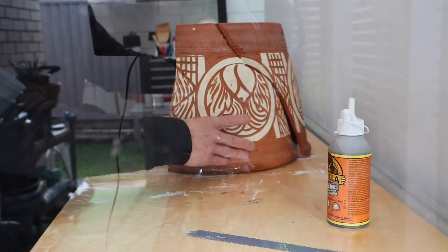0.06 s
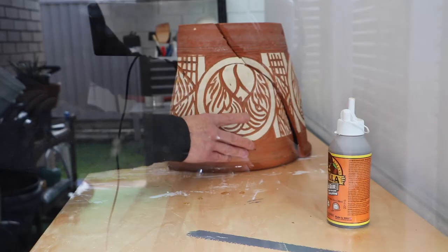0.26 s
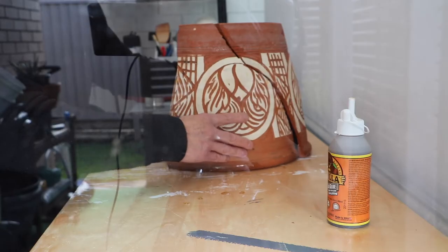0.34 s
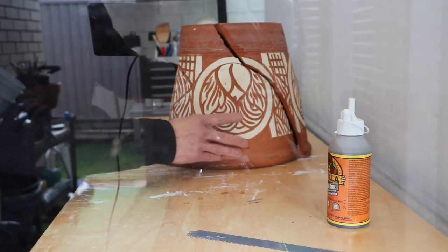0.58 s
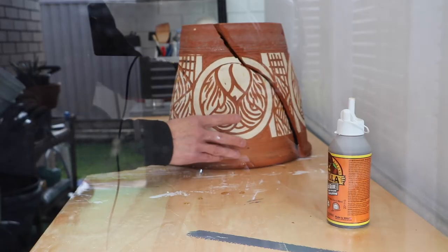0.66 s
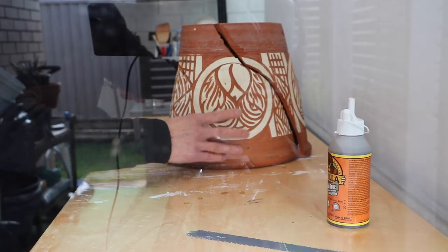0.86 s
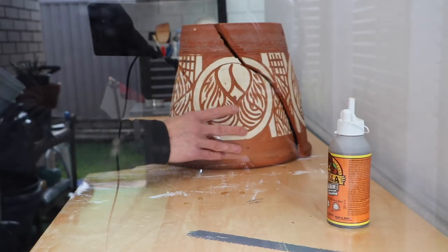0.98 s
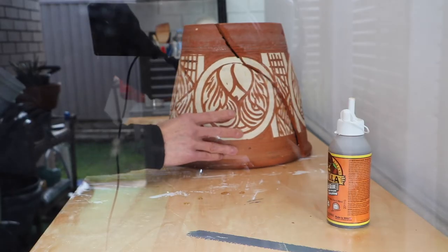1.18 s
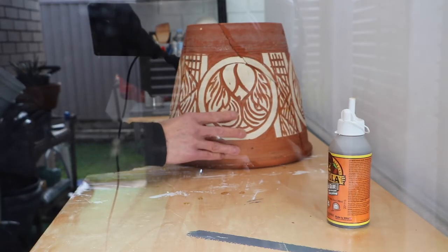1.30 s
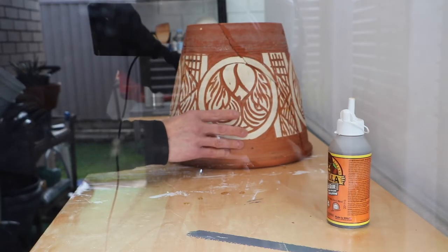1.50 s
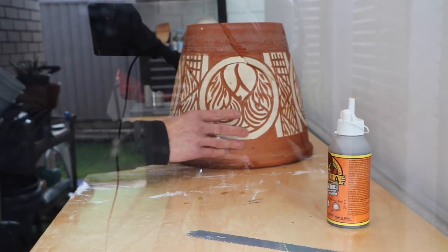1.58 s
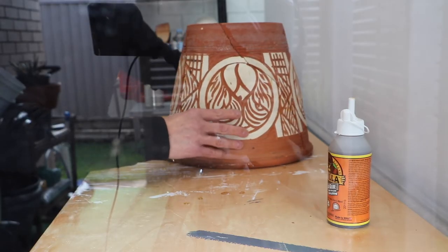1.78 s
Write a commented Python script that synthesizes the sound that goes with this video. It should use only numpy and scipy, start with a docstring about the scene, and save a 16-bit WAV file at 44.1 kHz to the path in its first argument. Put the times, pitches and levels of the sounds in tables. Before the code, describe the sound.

Close up in a small, bare room, a hollow clay pot thumps twice on a booming wooden table with a soft slide between. Two gritty shard scrapes follow, with ticking crumbs, over faint hiss and a low drone.

```python
"""A cracked clay pot, upside down on a wooden table, close to one microphone in a small, bare room.
It is set down with a knock, slid softly and knocked down again: the table top thumps and booms and the
hollow pot rings. Then a loose shard sticks and slips along the crack, in a long scrape and a short one.
Crumbs of clay tick, and a low drone swells under the room's hiss."""
import sys
import numpy as np
from scipy import signal
from scipy.fft import rfft, irfft
from scipy.io import wavfile

SR = 44100
rng = np.random.default_rng(int(sys.argv[2]) if len(sys.argv) > 2 else 0)


def wrap_up_sound(samples):
    """Save the sound to the file named by the first command line argument, as 16-bit audio."""
    columns = np.atleast_2d(samples).T
    # keep every value between -1 and 1, then stretch to whole-number steps
    tamed = np.clip(columns, -1, 1)
    steps = np.round(tamed * 32767).astype(np.int16)
    wavfile.write(sys.argv[1], SR, steps)


N = 81585
T = np.arange(N) / SR
CRACK_SWELL_S = .0002

# the pot bumps the table: start_s, thump_db, thump_hz, thump_t60_s, clack_db
BUMPS = [(0.2186, 0.2, 283, 0.025, -13), (0.6462, -2.5, 276, 0.0016, -16.5),
         (0.6523, -4.5, 203, 0.051, -34), (1.139, -16, 250, 0.058, -30), (1.176, -10.5, 358, 0.016, -29),
         (1.1849, -7, 291, 0.021, -31), (1.598, -16.5, 232, 0.011, -29), (1.6148, -13.5, 199, 0.0049, -25)]
# colour of the shard grinding in the crack: frequency_hz, density_db
GRIND_COLOUR = [(70, -37), (170, 11), (380, 5), (550, -1.5), (900, -2.5), (1400, -5), (2500, -3.5),
                (3200, -8), (4200, -8.5), (6500, -15), (9000, -21.5), (16000, -28)]


def from_db(db):
    """Decibels to gain."""
    return 10 ** (np.asarray(db) / 20)


def rms_one(x):
    """Scale to unit power."""
    return x / np.sqrt(np.mean(x ** 2) + 1e-20)


def level(curve):
    """Gain over time from (time_s, level_db) points, silent outside them."""
    return from_db(np.interp(T, *np.transpose(curve), left=-120, right=-120))


def at_hz(rows, hz, axis=1):
    """Read a column of a table on a log-frequency axis."""
    rows = np.array(rows)
    return np.interp(np.log(hz + 1), np.log(rows[:, 0]), rows[:, axis])


def filtered(x, kind, hz, order=2):
    """Butterworth low, high or band pass."""
    return signal.sosfilt(signal.butter(order, hz, kind, fs=SR, output="sos"), x)


def drift(rate_hz):
    """Slow random wander of unit power."""
    r = np.exp(-2 * np.pi * rate_hz / SR)
    return rms_one(signal.lfilter([1], [1, -2 * r, r * r], rng.standard_normal(2 * N))[N:])


def coloured(x, spectrum, size=8192):
    """Causal filter with the given spectrum that keeps the power of white noise."""
    gains = from_db(at_hz(spectrum, np.fft.rfftfreq(size, 1 / SR)))
    cepstrum = irfft(np.log(gains))
    cepstrum[1:size // 2] *= 2  # fold to minimum phase
    cepstrum[size // 2 + 1:] = 0
    response = irfft(np.exp(rfft(cepstrum)))
    return signal.fftconvolve(x, response / np.linalg.norm(response))[:N]


def dying(start_s, t60_s, swell_s, hold_s=0):
    """Envelope that swells from its start, holds, then dies away."""
    age = np.maximum(T - start_s, 0)
    rise = 1 - np.exp(-(age / swell_s) ** 2)
    return rise * np.exp(-np.log(1000) * np.maximum(age - swell_s - hold_s, 0) / t60_s)


def ringing(contact, modes, ring_db=0):
    """A contact force sets modes ringing, each a damped resonator."""
    out = np.zeros(N)
    for hz, db, t60 in modes:
        r = np.exp(-np.log(1000) / (t60 * SR))
        feed = np.array([1, 0, -1]) * (1 - r * r) / 2
        feedback = [1, -2 * r * np.cos(2 * np.pi * hz / SR), r * r]
        out += from_db(db + ring_db) * signal.lfilter(feed, feedback, contact)
    return out


def background(drone_hz=114.3, waver_hz=1.1, octave_db=-10, hiss_db=-40.5):
    """Room tone: steady hiss, a low rumble and a wavering drone."""
    # swells of the drone and the rumble: time_s, level_db
    drone_levels = [(.6, -55), (.75, -31.5), (.95, -45.5), (1.25, -43), (1.4, -31), (1.62, -28.5),
                    (1.72, -40.5), (1.85, -37.5)]
    rumble_levels = [(0, -46), (.44, -36.5), (1.85, -42)]
    # colours of the rumble and the hiss: frequency_hz, density_db
    rumble_colour = [(40, -15), (80, 13), (110, 16.5), (170, -15.5), (600, -77)]
    hiss_colour = [(25, 6.5), (50, 4.5), (85, 10), (150, -8), (240, 7), (500, -3.5), (1000, -3.5),
                   (2000, -14.5), (4000, -21), (8000, -26), (16000, -28.5)]
    phase = 2 * np.pi * np.cumsum(drone_hz + waver_hz * drift(rate_hz=3.9)) / SR
    drone = level(drone_levels) * rms_one(np.sin(phase) + from_db(octave_db) * np.sin(2 * phase))
    rumble = level(rumble_levels) * coloured(rng.standard_normal(N), rumble_colour)
    hiss = from_db(hiss_db) * coloured(rng.standard_normal(N), hiss_colour)
    return drone + rumble + hiss


def room(direct, delay_s=.012):
    """Diffuse reflections off the bare walls reach the microphone late; the low mids last longest."""
    # reverberation against the direct sound: frequency_hz, level_db, t60_s
    reverb = [(90, -20, 0.3), (268, -17, 0.96), (620, 2, 0.75), (1770, -10, 0.52), (4460, -15.5, 0.15),
              (12000, -10, 0.23)]
    edges = np.geomspace(45, 18000, 10)  # bands about an octave wide
    response = 0
    for low, high in zip(edges, edges[1:]):
        hz = np.sqrt(low * high)
        tail = dying(delay_s, at_hz(reverb, hz, axis=2), swell_s=.0024) * rng.standard_normal(N)
        band = filtered(tail, "band", [low, high])
        gain = from_db(at_hz(reverb, hz)) * np.sqrt(2 * (high - low) / SR)
        response = response + gain * band / np.linalg.norm(band)
    return signal.fftconvolve(direct, response)[:N]


def boom(centre_hz=211.6, width_hz=62):
    """Uneven friction drives the table top's broad low resonance."""
    # the wood booms as the pot drags on it: time_s, level_db
    boom_levels = [(.12, -52), (.19, -25.5), (.28, -32), (.33, -27.5), (.41, -31), (.49, -37.5),
                   (.56, -35.5), (.63, -26.5), (.9, -63), (1.07, -36.5), (1.13, -44)]
    band_hz = [centre_hz - width_hz / 2, centre_hz + width_hz / 2]
    return level(boom_levels) * rms_one(filtered(rng.standard_normal(N), "band", band_hz))


def grit(grains_per_s=8000, spread_db=2.8):
    """Dense clicks of uneven size as grains of clay catch and break."""
    sizes = from_db(spread_db * np.minimum(rng.exponential(1, N), 4))
    signs = rng.choice([-1, 1], N)
    breaks = rng.random(N) < grains_per_s / SR
    return rms_one(sizes * signs * breaks)


def ticks():
    """Crumbs crack under the rim in small bright bursts."""
    # cracking crumbs: start_s, relative_db, t60_s
    cracks = [(0.0333, -27.5, 0.01), (0.456, -30.5, 0.079), (0.9025, -21, .004), (1.308, -18.5, 0.087),
              (1.3369, -18.5, 0.024), (1.473, -20.5, .014), (1.5325, -32, 0.13), (1.5974, -19.5, 0.037),
              (1.673, -19.5, 0.0022), (1.788, -29, 0.069)]
    # their colour: frequency_hz, density_db
    colour = [(120, -1), (400, 11.5), (1500, 8), (4500, 3.5), (8000, -2.5), (12000, -5.5), (16000, -13)]
    force = sum(from_db(db) * dying(s, t60, CRACK_SWELL_S) for s, db, t60 in cracks)
    return coloured(force * grit(), colour)


def slips(slips_per_s=130, t60_s=.024):
    """The rough edges catch at uneven intervals; each release is sudden and dies quickly."""
    gap, size = rng.uniform(.3, 1.7, (2, 900))
    starts = (np.cumsum(gap) - gap[0]) / slips_per_s
    latest = np.searchsorted(starts, T, side="right") - 1
    return size[latest] * np.exp(-np.log(1000) * (T - starts[latest]) / t60_s)


def scrape(friction, colour, slip_db=6):
    """Grit under a stroke that sticks and slips."""
    stick_slip = rms_one(grit() * (1 + from_db(slip_db) * slips()))
    return coloured(level(friction) * stick_slip, colour)


def chip():
    """The short scrape and the crumbs ring a chipped edge, high and briefly."""
    # friction of the short stroke: time_s, relative_db
    friction = [(1.555, -42), (1.561, -24.5), (1.567, -21), (1.58, -29.5), (1.589, -21), (1.601, -25),
                (1.635, -52)]
    # its colour: frequency_hz, density_db
    colour = [(70, -29), (170, 8), (700, 5), (1600, -3), (3000, -5), (5600, -0.5), (8000, -11),
              (12300, -6.5), (16000, -26)]
    # modes of the edge: pitch_hz, relative_db, t60_s
    modes = [(2168, 7, 0.029), (3420, 9, 0.08), (5800, -3, 0.026)]
    grinding, crumbs = scrape(friction, colour), ticks()
    return grinding + crumbs + ringing(grinding, modes, ring_db=6.5) + ringing(crumbs, modes, ring_db=-8)


def jolts(t60_s=.055, low_cut_hz=320):
    """Sudden bursts of grit, with little bass, that fall away as the edges catch again."""
    # the shard jolts free: start_s, relative_db
    releases = [(1.134, -18.5), (1.1424, -19.5), (1.1675, -18.5), (1.1865, -12), (1.2068, -11.5),
                (1.2161, -16.5), (1.224, -19), (1.251, -19), (1.2615, -12)]
    force = sum(from_db(db) * dying(s, t60_s, CRACK_SWELL_S) for s, db in releases)
    return filtered(coloured(force * grit(), GRIND_COLOUR), "high", low_cut_hz)


def shard():
    """The long scrape: the shard rings weakly while wedged and more strongly as it comes loose."""
    # friction of the long stroke: time_s, relative_db
    friction = [(1.04, -47), (1.1, -46), (1.134, -35), (1.148, -17), (1.162, -23.5), (1.178, -15.5),
                (1.225, -22.5), (1.243, -19), (1.272, -24), (1.295, -27.5), (1.375, -32.5), (1.44, -44)]
    # how strongly the grinding drives the shard: time_s, gain_db
    loosening = [(1.17, -4), (1.215, 1.5)]
    # modes of the shard: pitch_hz, relative_db, t60_s
    modes = [(388, 1, .35), (583, 5, .55), (808, 5, .08), (856, 9, .11), (1232, 4, .2), (1551, 7, .1),
             (1710, 9, .25), (2152, 9, .1), (2688, 7, .13), (4040, 9, .07), (4685, 5, .12), (5075, 4, .12),
             (5915, 4, .15)]
    grinding = scrape(friction, GRIND_COLOUR) + jolts()
    freedom = from_db(np.interp(T, *np.transpose(loosening)))
    return grinding + ringing(grinding * freedom, modes)


def slide():
    """The rim rubs smoothly over the wood."""
    # friction of the rim: time_s, level_db
    friction = [(.12, -48.5), (.16, -48), (.172, -34), (.21, -42.5), (.28, -49), (.345, -35), (.39, -39),
                (.49, -46.5), (.525, -33.5), (.57, -43.5), (.64, -41), (.72, -51.5), (.85, -53)]
    # its colour: frequency_hz, density_db
    colour = [(80, -4), (230, 1), (500, -4.5), (1000, -15.5), (2000, -10), (2900, -14.5), (3800, -20),
              (5500, -20.5), (8000, -30.5), (16000, -36)]
    return coloured(level(friction) * rng.standard_normal(N), colour)


def thumps(low_cut_hz=145):
    """Each bump pushes the table top into a few heavily damped swings; it radiates little deep bass."""
    swings = np.zeros(N)
    for s, db, hz, t60, _ in BUMPS:
        envelope = from_db(db) * dying(s, t60, swell_s=.0012, hold_s=.0045)
        swings -= envelope * np.sin(2 * np.pi * hz * (T - s))
    return filtered(swings, "high", low_cut_hz)


def clacks():
    """The rim crunches briefly as it lands."""
    # colour of the crunch: frequency_hz, density_db
    colour = [(150, -10.5), (450, 6), (900, -11), (1600, -3.5), (2800, -9), (5000, -13.5), (7000, -23),
              (11000, -29), (16000, -34)]
    force = sum(from_db(db) * dying(s, t60_s=.04, swell_s=.0021) for s, *_, db in BUMPS)
    return coloured(force * rng.standard_normal(N), colour)


def taps(push_db=31, high_cut_hz=1000):
    """Each landing gives the clay wall one push, softened by the wood."""
    force = np.zeros(N)
    for s, *_, clack_db in BUMPS:
        force[int(s * SR)] = from_db(clack_db + push_db)
    return filtered(force, "low", high_cut_hz, order=1)


def pot():
    """Knocks and sliding set the hollow pot ringing."""
    # modes of the whole pot: pitch_hz, relative_db, t60_s
    modes = [(195, 6, .65), (215, 0, .45), (830, 7, .04), (1152, 8, .45), (1637, 7, .25), (2690, 6, .08),
             (2855, 8, .22), (3280, 5, .06)]
    knocks, rubbing = thumps() + clacks(), slide()
    return knocks + rubbing + ringing(knocks + taps(), modes) + ringing(rubbing, modes, ring_db=4)


def scene():
    """At the microphone, in mono: pot, shard and table, their reflections and the room tone."""
    direct = pot() + boom() + from_db(-1.5) * shard() + from_db(-6) * chip()
    return (direct + room(direct) + background())[None]


def record(dry):
    """Peaks clip at full scale, then the top treble is cut steeply."""
    cutoff_hz = 15750
    high_cut = signal.ellip(10, .1, 90, cutoff_hz, fs=SR, output="sos")
    return signal.sosfilt(high_cut, np.clip(dry, -1, 1))


dry = scene()
out = record(dry)
wrap_up_sound(out)
```